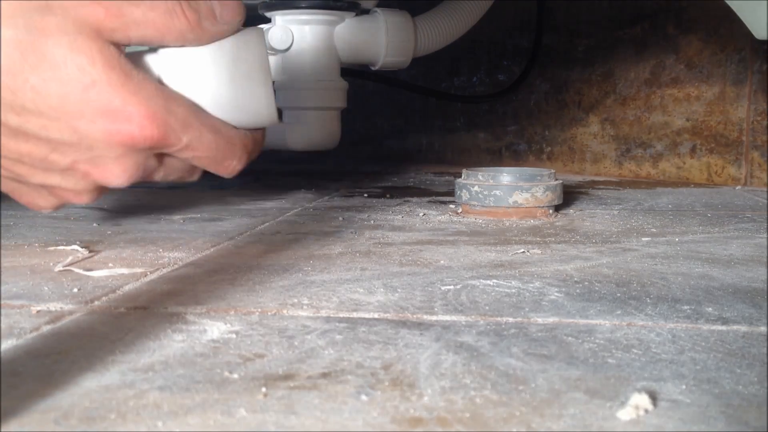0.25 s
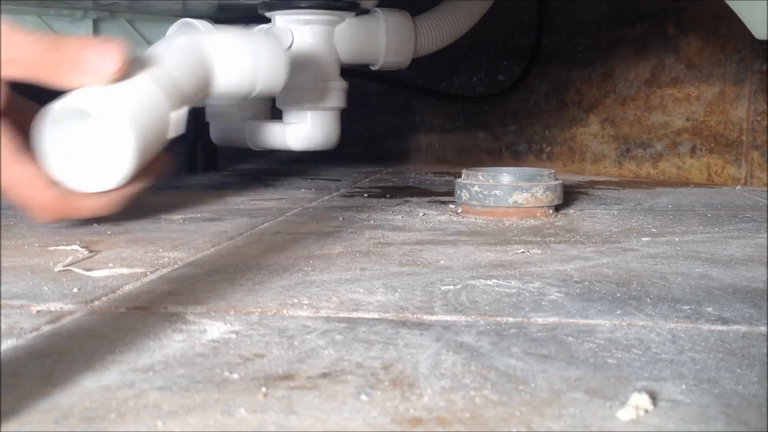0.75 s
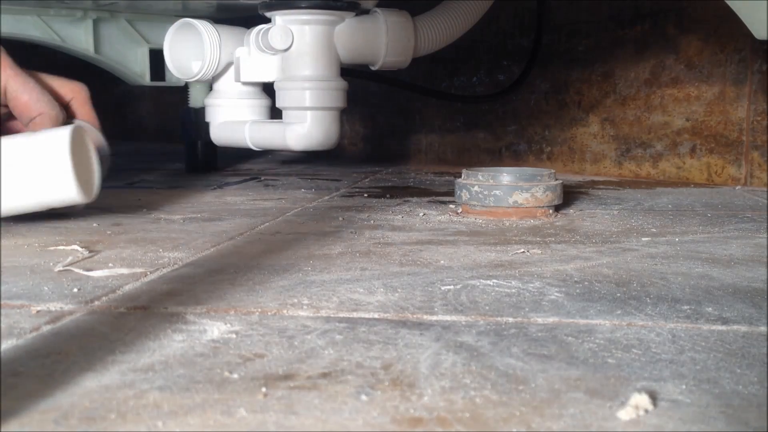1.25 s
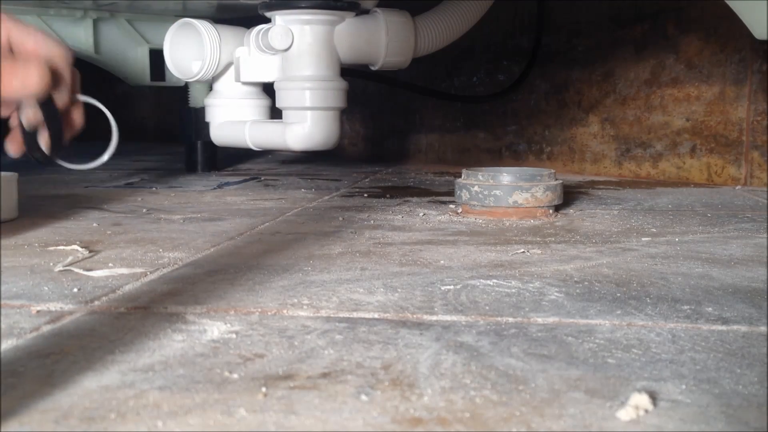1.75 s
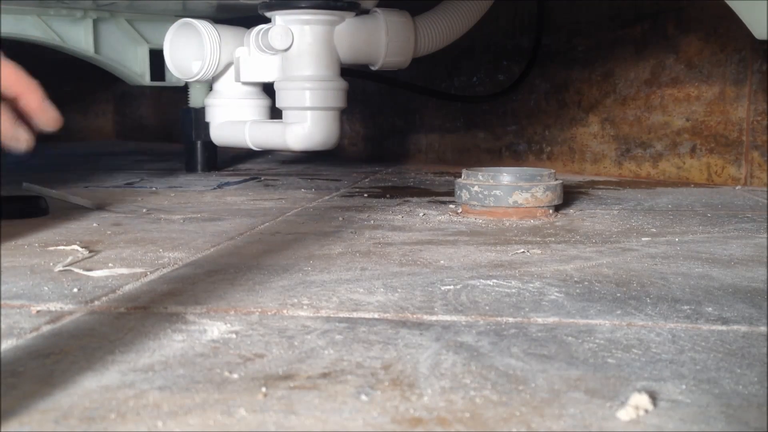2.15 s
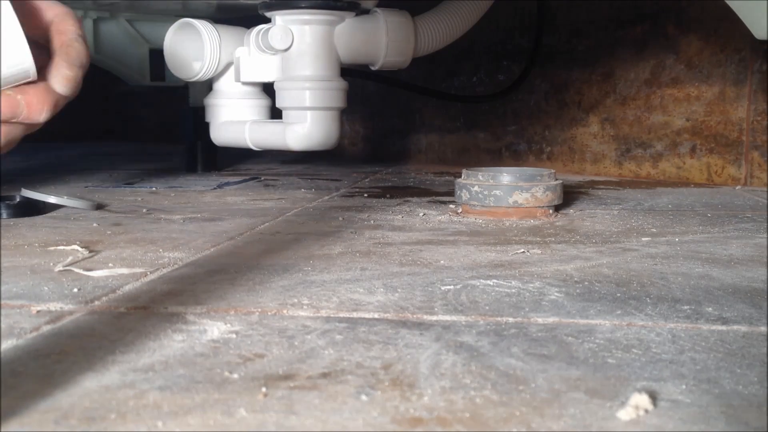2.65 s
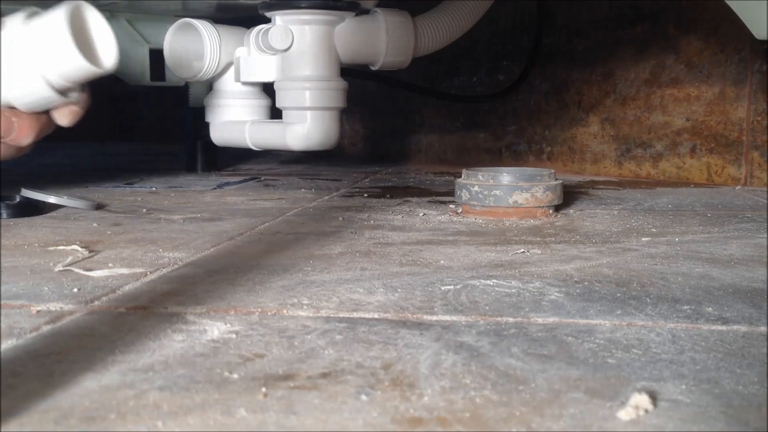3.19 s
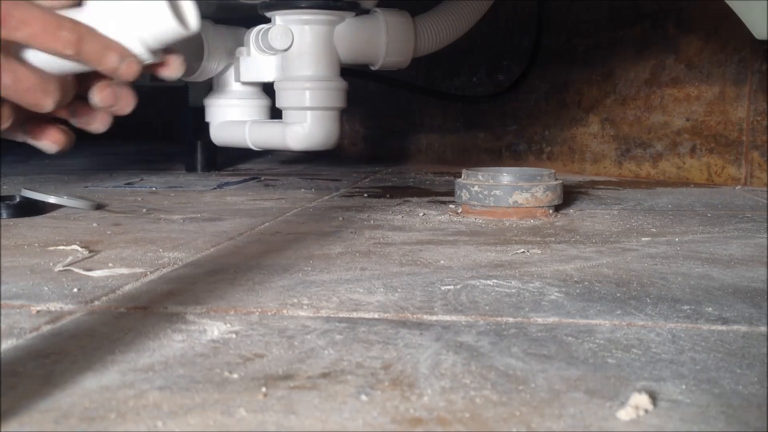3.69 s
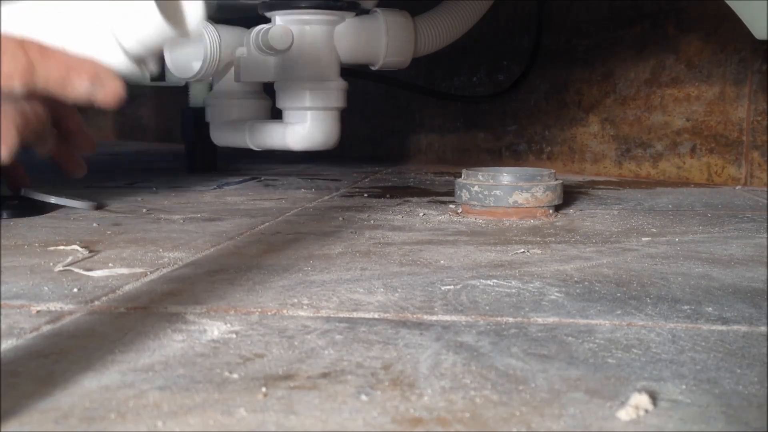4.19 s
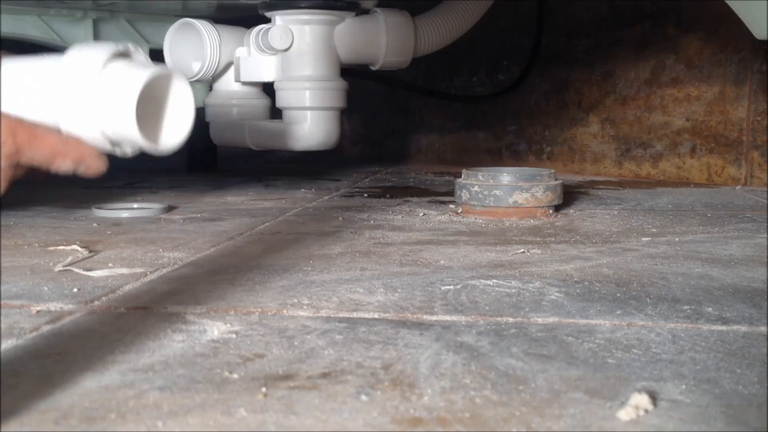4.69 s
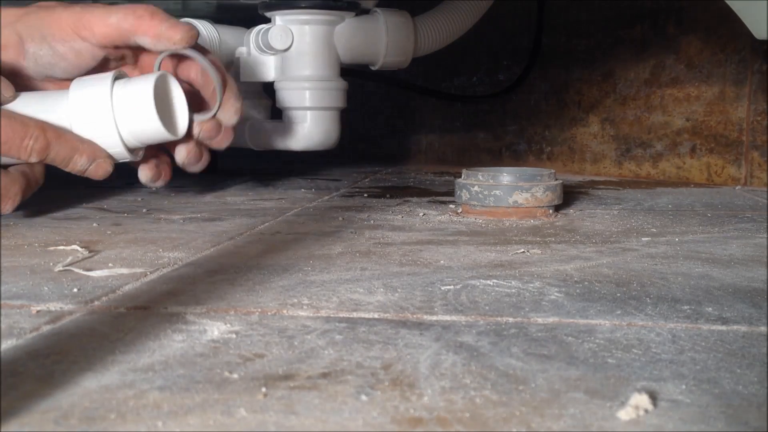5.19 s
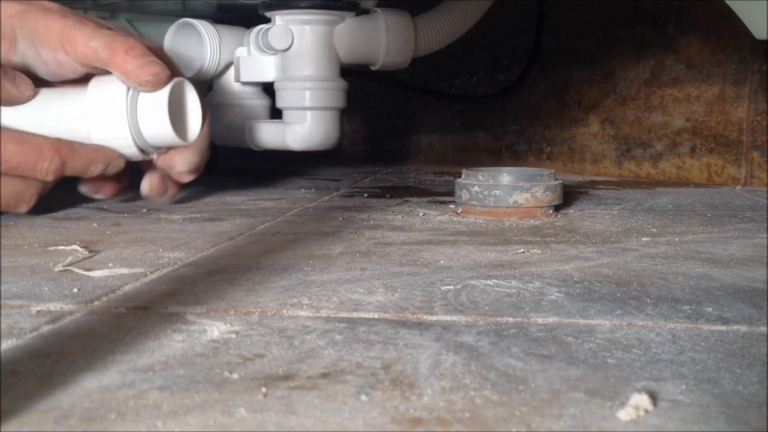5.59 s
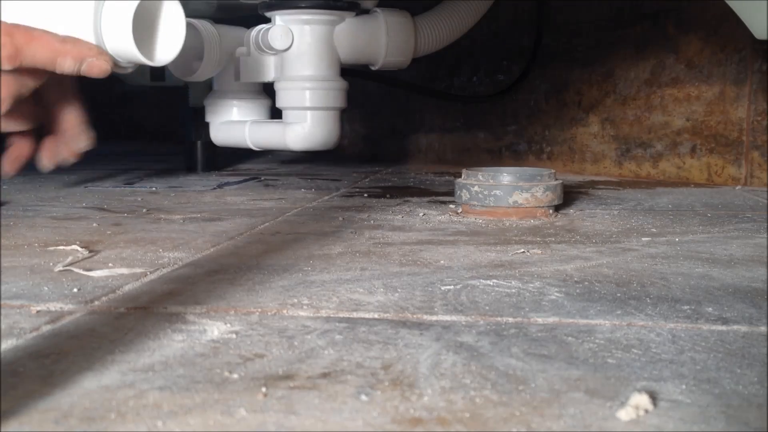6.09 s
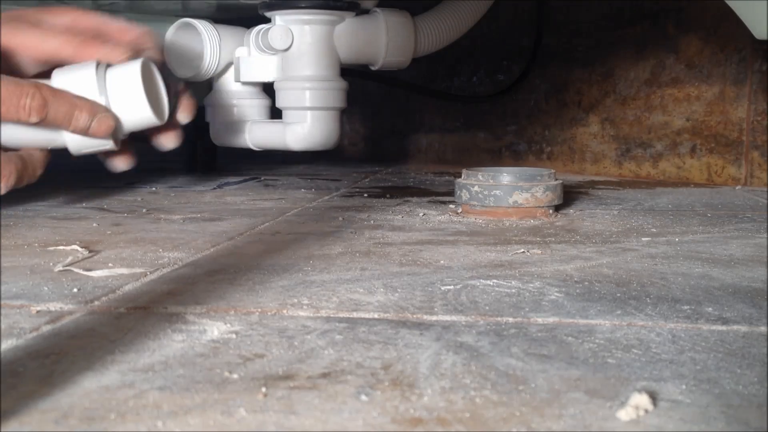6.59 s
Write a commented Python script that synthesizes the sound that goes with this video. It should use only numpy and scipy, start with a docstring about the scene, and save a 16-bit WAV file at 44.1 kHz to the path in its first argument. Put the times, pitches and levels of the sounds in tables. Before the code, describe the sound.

Close to the microphone in a hard, echoing bathroom, hands rub and turn plastic waste fittings. Soft scuffs and sparse clicks come first, then hollow pipe knocks, scratchy scrapes and bright clicks crowd together from about two and a half seconds. The loudest moment is a cluster of booming thumps against the tub just after four seconds. Afterwards there are only light clicks, short scrapes and faintly singing brushes over a low room hum.

```python
"""Plastic waste fittings are handled and tried against a trap under a bath, close by, in an echoing bathroom.
From the start, hands rumble and rub, fingertips hiss, an elbow turns in the palm and pieces scrape: shaped noise
and slips. Soon blows boom in tub modes, taps and knocks ring air resonances, and rims click as noise bursts.
Midway dull bumps begin, as low noise; late on, brushed pipes sing as one resonator. A faint rush and hum stay."""
import sys
import numpy as np
from scipy import signal
from scipy.fft import rfft, irfft
from scipy.io import wavfile

SR = 44100
rng = np.random.default_rng(int(sys.argv[2]) if len(sys.argv) > 2 else 0)


def log_audio(samples):
    """Write samples as a 16-bit WAV file to the path given in sys.argv[1]."""
    # one column per channel
    frames = np.atleast_2d(samples).T
    # limit to full scale, then quantise
    limited = np.clip(frames, -1, 1)
    pcm = np.round(limited * 32767).astype(np.int16)
    wavfile.write(sys.argv[1], SR, pcm)


N = 302085
TIME = np.arange(N) / SR

# All table levels are relative; further gains follow.
# still room, spectrum: freq_hz, level_db_per_hz
QUIET_SPECTRUM = [(30, -41), (90, 0), (240, 21), (500, 0.5), (2000, 3), (4000, 1), (10000, -5), (15000, -7)]
# work of the hands: time_s, level_db
HAND_EFFORT = [(0.0, -42), (.4, -51.5), (1.3, -48), (1.52, -37), (1.75, -53.5), (2.57, -54.5),
               (2.74, -43.5), (3.2, -49), (3.45, -42), (3.97, -36.5), (4.28, -54.5), (4.47, -32.5),
               (4.8, -51), (5.12, -58), (5.5, -54.5), (6.0, -65), (6.2, -58), (6.36, -63), (6.56, -58),
               (6.85, -63.5)]
# grip rumble, spectrum: freq_hz, level_db_per_hz
RUMBLE_SPECTRUM = [(25, -54), (62, -49), (85, -5.5), (115, -10.5), (165, 1), (235, 2), (285, -0.5),
                   (350, 5.5), (450, -9.5), (900, -35.5)]
# skin rub, spectrum: freq_hz, level_db_per_hz
RUB_SPECTRUM = [(250, -24.5), (520, 10), (750, 2), (950, 5.5), (1500, 0.5), (2400, -3), (4000, -16),
                (9000, -16.5), (15000, -30)]
# modes of the tub and the space beneath: freq_hz, level_db, t60_s
TUB_MODES = [(93, -28, 0.45), (176, -7.5, .13), (210, -7.5, .09), (246, -1.5, 0.12), (288, -5, .09),
             (314, -4.5, 0.11), (353, -2.5, 0.14), (394, -7, 0.09), (533, -12, 0.2), (591, -9, .22),
             (624, -2.5, 0.13)]
# fingertip glides: start_s, end_s, hiss_db, rub_db
GLIDES = [(0.0, 0.274, -48, -55), (0.38, 0.645, -48, -79), (0.613, 0.753, -44.5, -42),
          (0.798, 1.127, -42, -44), (1.31, 1.555, -39, -41), (1.872, 2.585, -58.5, -61.5),
          (2.002, 2.05, -67, -35), (3.007, 3.058, -26.5, -31), (3.37, 3.538, -42.5, -68),
          (3.527, 3.698, -35, -40), (3.707, 3.836, -50, -28.5), (3.97, 4.066, -70, -32.5),
          (4.937, 4.967, -49.5, -52), (5.112, 5.34, -55.5, -74), (5.523, 5.786, -48, -78),
          (5.86, 6.003, -50.5, -74), (6.426, 6.564, -57.5, -58.5)]
# fingertip hiss, spectrum: freq_hz, level_db_per_hz
HISS_SPECTRUM = [(1000, 0), (2700, 14.5), (4000, 14), (6800, 16.5), (8200, 12), (10000, 5.5), (15000, 7)]
# resonances of the elbow cupped in the palm: freq_hz, level_db, t60_s
ELBOW_MODES = [(202.5, -72.5, .13), (769, -68.5, 0.066), (1425, -68, .025)]
# strokes of plastic on plastic: peak_s, rise_s, strength_db, brightness_db, judder_db
SCRAPES = [(.004, 0.076, -47.5, -5.5, -66), (.71, 0.039, -69, -23, -72.5), (1.38, .06, -62.5, 16.5, -79),
           (1.518, 0.065, -56.5, -18, -67.5), (2.002, 0.021, -55, 11, -77), (2.971, 0.0078, -36, -0.5, -71),
           (3.046, 0.063, -36.5, -1.5, -87), (3.452, 0.02, -50, -9.5, -72), (3.745, 0.063, -39, 2.5, -56),
           (3.815, 0.043, -37, 3, -59.5), (4, 0.029, -43.5, -3, -60.5), (4.513, 0.15, -42, -5, -79),
           (4.574, 0.07, -39.5, 2, -66.5), (5.44, 0.008, -57, -6.5, -100), (5.576, 0.03, -46, -1.5, -100),
           (5.705, 0.036, -52, -1.5, -100), (6.19, 0.035, -61.5, 6.5, -100), (6.724, 0.039, -63.5, 0, -99)]
# air in the joined pipework: freq_hz, level_db, t60_s
PIPEWORK_MODES = [(222, -3.5, 0.072), (393, -2, 0.13), (500, -3, 0.1), (730, 4, 0.05), (846, 1.5, 0.045),
                  (1050, 3.5, 0.024), (1223, 1, 0.04), (1450, 3.5, 0.035), (1558, 1, 0.044)]
# plastic wall, low register: freq_hz, level_db_per_hz
CLACK_SPECTRUM = [(100, -36.5), (220, 10.5), (500, -1), (800, -3), (1100, 4.5), (1450, 0.5), (1900, -1.5),
                  (2400, 1), (3400, -14.5), (7000, -89.5)]
# plastic wall, bright register: freq_hz, level_db_per_hz
TICK_SPECTRUM = [(1200, -11.5), (2700, -2), (4200, 9), (5300, 7), (6400, 10), (8300, 4.5), (9800, -38),
                 (15000, -19)]
# plastic wall, fine top register: freq_hz, level_db_per_hz
EDGE_SPECTRUM = [(5000, -21), (9000, 9.5), (11000, 9), (15000, 8.5)]
# blows carried into tub and floor: time_s, boom_db, wall_strength_db
THUMPS = [(0.191, -34, -50.5), (2.597, -28, -54.5), (3.279, -23.5, -37.5), (3.718, -44, -50.5),
          (3.9861, -35, -44.5), (4.024, -20, -42.5), (4.1385, -14, -30.5), (4.1584, -14, -50),
          (4.312, -32.5, -68), (6.069, -48, -75), (6.128, -43.5, -83), (6.426, -49, -74)]
# small hollow knocks of the joined pipework: time_s, level_db
TAPS = [(.193, -44), (.203, -46), (.224, -44), (3.262, -31.5), (3.296, -35.5), (3.4, -48.5), (3.456, -38),
        (3.548, -35.5), (3.718, -38), (3.755, -33.5), (3.92, -41.5), (3.987, -33), (4.022, -30.5),
        (6.128, -63.5)]
# knocks on an open pipe: time_s, strength_db, brightness_db, air_ring_db, air_pitch_hz
KNOCKS = [(0.537, -56.5, -22, -22, 1070), (0.649, -44.5, -19.5, -18.5, 1390),
          (1.2453, -50.5, -4, -28, 2920), (2.683, -39, -11, -13.5, 943), (2.712, -26.5, -5, -3.5, 894),
          (2.822, -40, -16, -12.5, 908), (2.918, -54, -10, -22, 1510), (3.018, -32, -7, -14.5, 902),
          (3.2597, -31, -7.5, -19, 917), (3.54, -35, -5.5, -19, 1510), (5.297, -38, 3.5, -23, 2260),
          (5.319, -53.5, -13.5, -34, 2480), (5.631, -43.5, -3.5, -35, 863), (5.706, -45.5, -3, -34, 856),
          (5.890, -68, -17, -34.5, 920), (5.916, -58, -16, -36.5, 950), (6.726, -59, -7, -39.5, 885)]
# partials of the short pipe's air: ratio_to_air_pitch, level_db, cycles_to_fall_60_db
PIPE_PARTIALS = [(1.002, 3.5, 23), (1.149, -11.5, 50), (1.62, -31, 46), (1.87, -15, 33), (2.35, -18, 48),
                 (3.6, -9, 70), (4.6, -18, 71)]
# hard clicks of rims and rings: time_s, strength_db, brightness_db
CLICKS = [(0.858, -48, 1), (1.1704, -47, 2.5), (1.2892, -45.5, -7), (1.579, -40.5, 10.5),
          (2.2999, -37, -5.5), (3.052, -24, 2), (3.278, -40.5, 15), (3.44, -42.5, 8.5), (3.744, -24.5, 4.5),
          (3.802, -40, 12), (3.918, -42.5, -12.5), (3.979, -48, 5), (4.394, -41, 3.5), (4.508, -39.5, 13.5)]
# soft, deep bumps: time_s, level_db
BUMPS = [(2.6, -50), (3.28, -41.5), (6.135, -52), (6.424, -62)]
# brushes of a lightly held pipe: time_s, level_db
BRUSHES = [(5.439, -53), (5.63, -55.5), (5.708, -55.5), (5.775, -59)]
# room decay: freq_hz, t60_s
ROOM_DECAY = [(100, 0.78), (260, 0.77), (700, 0.75), (1900, 0.45), (5000, 0.45), (13000, 0.34)]

BORE_HZ, BORE_T60_S = 858, 0.26


def from_db(db):
    """Decibels to gain."""
    return 10 ** (np.asarray(db) / 20)


def rms_one(x):
    """Scale to an rms of 1."""
    return x / np.sqrt(np.mean(x ** 2) + 1e-20)


def at_hz(points, hz):
    """Read a table on a log-frequency axis."""
    known_hz, values = np.transpose(points)
    return np.interp(np.log(np.maximum(hz, 1)), np.log(known_hz), values)


def colour(x, spectrum, size=4096):
    """Causal (minimum-phase) filter that keeps the power of white noise."""
    gain = rms_one(from_db(at_hz(spectrum, np.linspace(0, SR / 2, size // 2 + 1))))
    cepstrum = irfft(np.log(gain))[:size // 2]
    cepstrum[1:] *= 2   # fold to minimum phase
    response = irfft(np.exp(rfft(cepstrum, size)))
    return signal.oaconvolve(x, response)[:N]


def band(x, hz, kind):
    """Second-order Butterworth filter."""
    return signal.sosfilt(signal.butter(2, hz, kind, fs=SR, output="sos"), x + 1e-18)


def ring(x, hz, t60_s):
    """Resonator: a unit click sets a decaying sine of height 1 ringing."""
    radius = from_db(-60 / (t60_s * SR))
    angle = 2 * np.pi * hz / SR
    return signal.lfilter([0, np.sin(angle)], [1, -2 * radius * np.cos(angle), radius ** 2], x + 1e-18)


def add(track, time_s, sound):
    """Lay a sound into a track at a time."""
    at = max(round(time_s * SR), 0)
    track[..., at:at + sound.shape[-1]] += sound[..., :N - at]


def impulses(events):
    """One single-sample push per (time_s, level_db) event."""
    force = np.zeros(N)
    for time_s, level_db in events:
        add(force, time_s, from_db([level_db]))
    return force


def friction(slips_per_s, slip_share, uneven_db, uneven_hz):
    """Smooth rubbing noise plus tiny slips, under a wavering pressure; rms 1."""
    slips = rms_one((rng.random(N) < slips_per_s / SR) * rng.uniform(-1.19, 1, N))
    force = np.sqrt(slip_share) * slips + np.sqrt(1 - slip_share) * rng.standard_normal(N)
    pressure = np.interp(TIME * uneven_hz, np.arange(N), rng.uniform(-1.33, 1.55, N))
    return rms_one(force * from_db(uneven_db * pressure))


def registers(strength_db, brightness_db, tick_db):
    """Levels of clack, tick and edge: brightness moves strength from bottom to top."""
    return np.array([strength_db - brightness_db, strength_db + tick_db, strength_db + brightness_db])


def contact(levels_db, t60_s, snap, size=8192):
    """A sharp snap, then dense vibration of the wall, dying quickly; one row per register."""
    shiver = rng.standard_normal(size) * from_db(-60 * TIME[:size] / t60_s)
    shiver[0] = snap
    return np.outer(from_db(levels_db), shiver)


def plastic(drive):
    """The wall answers with a low clack, a bright tick and a fine edge."""
    spectra = (CLACK_SPECTRUM, TICK_SPECTRUM, EDGE_SPECTRUM)
    return sum(colour(row, spectrum) for row, spectrum in zip(drive, spectra))


def pipework(force, wander_per_s=30, wander_db=8):
    """Joined pipes answer with a hollow cluster of notes; the mix shifts as the point of contact wanders."""
    answer = np.zeros(N)
    wander_points = rng.uniform(-1, 1, (len(PIPEWORK_MODES), N // 100))
    for k, ((hz, level_db, t60_s), points) in enumerate(zip(PIPEWORK_MODES, wander_points)):
        mix = np.interp(TIME * wander_per_s, np.arange(len(points)), points)
        drive = force * from_db(level_db + wander_db * mix)
        answer += (-1) ** k * ring(drive, hz, t60_s)
    return answer


def quiet(hum_hz=248, hum_t60_s=0.5):
    """The still room: a faint coloured rush and a low hum, noise through one resonance."""
    rush = colour(rng.standard_normal(N), QUIET_SPECTRUM)
    hum = rms_one(ring(rng.standard_normal(N), hum_hz, hum_t60_s))
    return from_db(-65.0) * rush + from_db(-66.5) * hum


def hands():
    """Skin on plastic: a lumpy rumble from the grip and a grainy rub, both growing with effort."""
    effort = from_db(np.interp(TIME, *np.transpose(HAND_EFFORT)))
    grip = friction(slips_per_s=280, slip_share=0.13, uneven_db=4.0, uneven_hz=40.3)
    skin = friction(slips_per_s=390, slip_share=0.4, uneven_db=-0.5, uneven_hz=93.3)
    rumble = colour(effort * grip, RUMBLE_SPECTRUM)
    rub = colour(effort * skin, RUB_SPECTRUM)
    # the space under the tub hums along at its own resonances
    hum = np.zeros(N)
    for hz, level_db, t60_s in TUB_MODES:
        hum += from_db(level_db) * np.gradient(ring(rumble, hz, t60_s)) / (hz * np.sqrt(t60_s))
    return from_db(-2.5) * rumble + from_db(5.0) * hum + from_db(-2.5) * rub


def glides(ramp_s=0.11):
    """A fingertip hisses and rubs as it moves: friction gated by ramps centred on start and end."""
    force = np.zeros((2, N))
    for start_s, end_s, *levels_db in GLIDES:
        motion = np.clip(np.minimum(TIME - start_s, end_s - TIME) / ramp_s + 0.5, 0, 1)
        force += np.outer(from_db(levels_db), motion)
    hiss, rub = (row * friction(slips_per_s=450, slip_share=0.25, uneven_db=2.2, uneven_hz=70)
                 for row in force)
    return colour(hiss, HISS_SPECTRUM) + colour(rub, RUB_SPECTRUM)


def elbow(turn_s=0.34, lowest_hz=150):
    """Skin catches in uneven grains on the turning elbow and sounds its hollow."""
    grains = friction(slips_per_s=200, slip_share=0.8, uneven_db=3, uneven_hz=40)
    fade = np.sqrt(np.maximum(1 - TIME / turn_s, 0))
    force = band(grains * fade, lowest_hz, "high")
    return sum(from_db(level_db) * ring(force, hz, t60_s) for hz, level_db, t60_s in ELBOW_MODES)


def scrapes(fade_s=0.021, air_db=-27.5, lowest_hz=750):
    """Strokes swell and fade; fine slips shake the wall and sound the bore, coarse ones judder the pipework."""
    force = np.zeros((5, N))   # clack, tick, edge, air, judder
    for peak_s, rise_s, strength_db, brightness_db, judder_db in SCRAPES:
        rise = np.interp(TIME, [peak_s - rise_s, peak_s], [0, 1])
        stroke = rise * np.exp(-np.maximum(TIME - peak_s, 0) / fade_s)
        wall_db = registers(strength_db, brightness_db, tick_db=3.0)
        force += np.outer(from_db([*wall_db, strength_db + air_db, judder_db]), stroke)
    *wall, breeze, judder = force
    grit = friction(slips_per_s=900, slip_share=0.6, uneven_db=3.8, uneven_hz=150)
    jerks = friction(slips_per_s=170, slip_share=0.9, uneven_db=1.5, uneven_hz=60)
    stir = breeze * grit
    bore = from_db(-3) * ring(stir, BORE_HZ, BORE_T60_S)   # muted by the grip
    overtone = from_db(-9) * ring(stir, 2330, t60_s=0.03)
    mouth = ring(stir, 1030, t60_s=0.013)   # broad resonance of the open end
    scraped_wall = band(plastic(np.array(wall) * grit), lowest_hz, "high")
    return scraped_wall + bore + overtone - mouth + pipework(judder * jerks)


def thumps(boom_db=-6.0, swell_s=0.0015, lowest_hz=130, softening=0.16, spot_db=4.5):
    """Blows set tub modes booming; soft ones favour the low modes, and each spot has its own mix."""
    wall, boom, t = np.zeros((3, N)), np.zeros(N), TIME[:SR // 2]
    hz, mode_db, t60_s = np.transpose(TUB_MODES)
    decay = from_db(-60 * np.outer(1 / t60_s, t))
    modes = np.sin(2 * np.pi * np.outer(hz, t)) * decay * (1 - np.exp(-t / swell_s))
    octaves = np.log2(hz / hz[np.argmax(mode_db)])   # from the strongest mode
    signs = (-1) ** np.arange(len(hz))
    spots = rng.uniform(-0.78, 1, (len(THUMPS), len(hz)))
    for (time_s, blow_db, strength_db), spot in zip(THUMPS, spots):
        brightness_db = -6 + 0.19 * blow_db   # heavier blows are brighter
        wall_db = registers(strength_db, brightness_db, tick_db=0.5)
        add(wall, time_s, contact(wall_db, t60_s=0.057, snap=3.5))
        levels_db = boom_db + blow_db + mode_db + softening * blow_db * octaves + spot_db * spot
        add(boom, time_s, (signs * from_db(levels_db)) @ modes)
    return plastic(wall) + band(boom, lowest_hz, "high")   # the boom carries little deep bass


def taps():
    """Fittings bump against the pipework: single pushes ring its air."""
    return pipework(impulses(TAPS))


def knocks(air_db=-2.0, swell_cycles=1.76, bore_db=-61, lowest_hz=560, top_hz=3600, size=8192):
    """A knock cracks the wall; the pipe's air pops for some cycles and leaves a faint note in the bore."""
    wall, air, t = np.zeros((3, N)), np.zeros(N), TIME[:size]
    for time_s, strength_db, brightness_db, ring_db, pitch_hz in KNOCKS:
        wall_db = registers(strength_db, brightness_db, tick_db=4.5)
        add(wall, time_s, contact(wall_db, t60_s=0.062, snap=0.99))
        tone = np.zeros(size)
        for ratio, level_db, cycles in PIPE_PARTIALS:
            hz = pitch_hz * ratio
            tone += from_db(level_db - 60 * t * hz / cycles) * np.sin(2 * np.pi * hz * t)
        swell = 1 - np.exp(-t * pitch_hz / swell_cycles)
        add(air, time_s, from_db(ring_db + air_db) * tone * swell)
    crack = band(plastic(wall), lowest_hz, "high")
    pop = band(air, top_hz, "low")
    return crack + pop + from_db(bore_db) * ring(air, BORE_HZ, BORE_T60_S)


def clicks():
    """Rims meet without stirring the air inside: wall contact alone."""
    wall = np.zeros((3, N))
    for time_s, strength_db, brightness_db in CLICKS:
        wall_db = registers(strength_db, brightness_db, tick_db=2.5)
        add(wall, time_s, contact(wall_db, t60_s=0.069, snap=6.1))
    return plastic(wall)


def bumps(lowest_hz=78, top_hz=150, t60_s=0.48):
    """Dull shudders: low band noise that starts at once and dies away."""
    level = np.zeros(N)
    for time_s, level_db in BUMPS:
        level += from_db(level_db - 60 * np.maximum(TIME - time_s, 0) / t60_s) * (TIME > time_s)
    shudder = band(level * rng.standard_normal(N), [lowest_hz, top_hz], "band")
    return shudder * np.sqrt(SR / 2 / top_hz)   # makes up for the narrow band


def singing_bore():
    """Each light brush sounds the note of the bore anew."""
    return ring(impulses(BRUSHES), BORE_HZ, BORE_T60_S)


def bathroom(x, gap_s=0.0016, swell_s=0.00084, count=9):
    """Dense echoes off hard walls: noise bands with their own decays; the treble dies first."""
    t = TIME[:SR * 3 // 4]
    white = rfft(rng.standard_normal(len(t)))
    hz = np.linspace(0, SR / 2, len(t) // 2 + 1)
    centres_hz = np.geomspace(60, 15000, count)
    tail = np.zeros(len(t))
    for centre_hz, pick in zip(centres_hz, np.eye(count)):
        noise_band = irfft(white * at_hz(np.c_[centres_hz, pick], hz), len(t))
        tail += noise_band * from_db(-60 * t / at_hz(ROOM_DECAY, centre_hz))
    tail *= 1 - np.exp(-np.maximum(t - gap_s, 0) / swell_s)
    return signal.oaconvolve(x, tail / np.linalg.norm(tail))[:N]


def scene():
    """Mix all sources; contacts and rubbing each send their own share to the room."""
    rubbing = from_db(-3.5) * hands() + from_db(-7.0) * glides() + elbow() + scrapes()
    thump = from_db(1.5) * thumps()
    knock = taps() + from_db(-1.0) * knocks()
    click = from_db(-3.5) * clicks()
    direct = rubbing + thump + knock + click
    echoing = from_db(-9.0) * rubbing + from_db(-4.5) * thump + from_db(-7) * knock + from_db(-6.5) * click
    mix = quiet() + direct + bathroom(echoing) + bumps() + singing_bore()
    return mix[None]


def record(dry):
    """Steep elliptic low-pass cuts the top."""
    cutoff_hz, ripple_db, stop_db = 15600, 0.1, 80
    return signal.sosfilt(signal.ellip(12, ripple_db, stop_db, cutoff_hz, fs=SR, output="sos"), dry)


dry = scene()
out = record(dry)
log_audio(out)
```